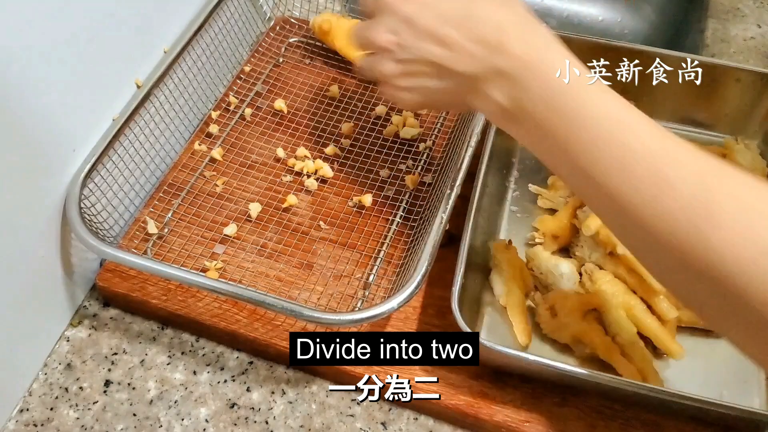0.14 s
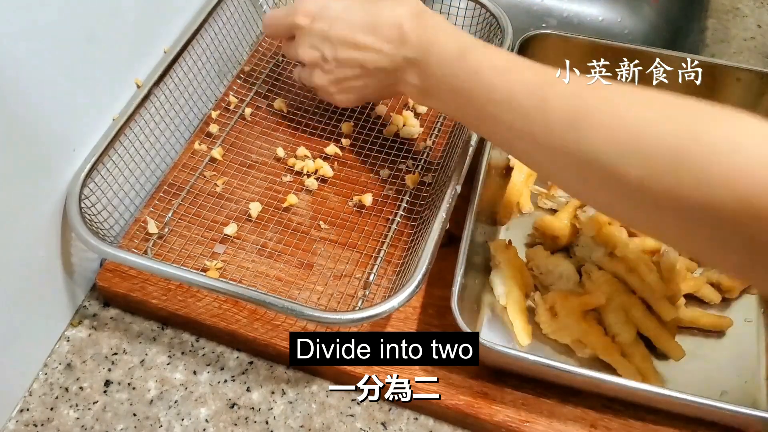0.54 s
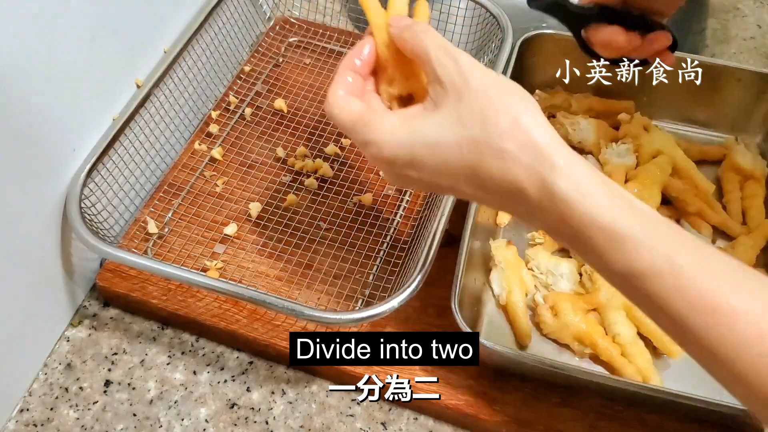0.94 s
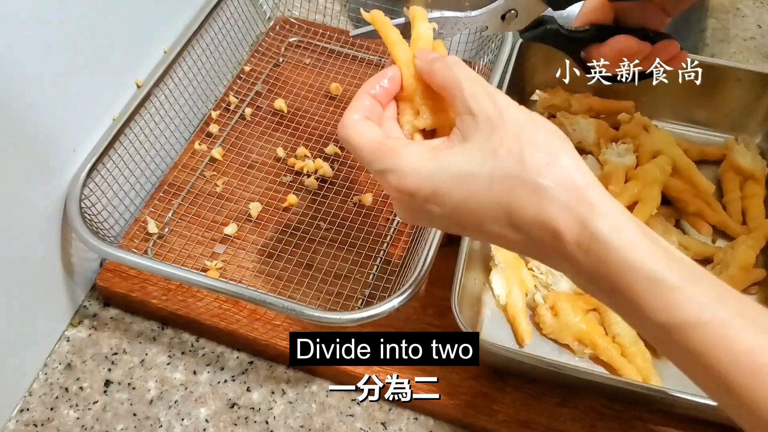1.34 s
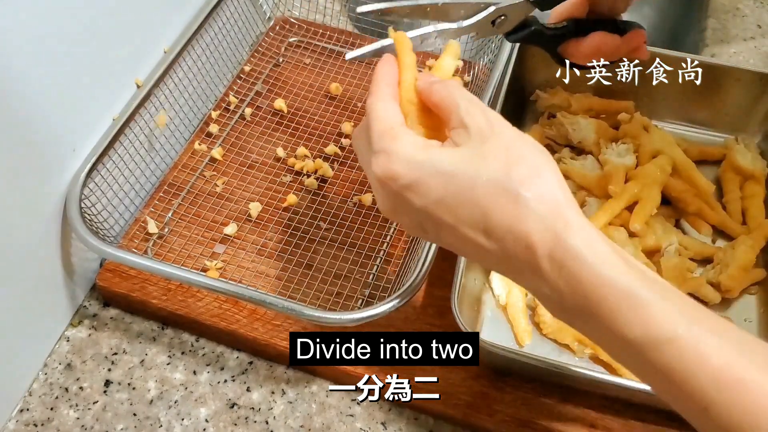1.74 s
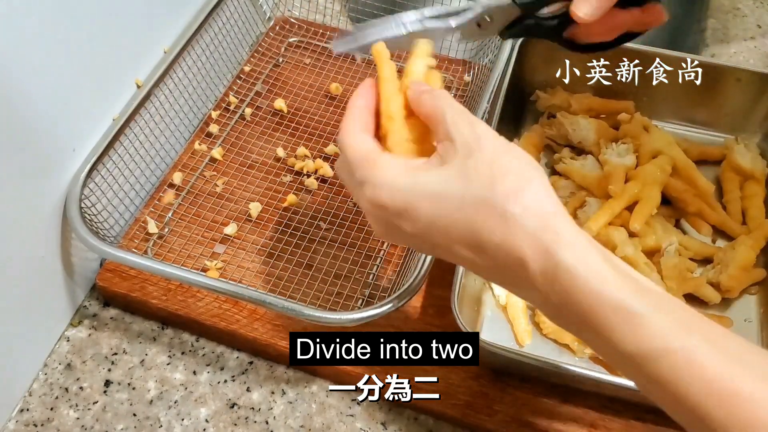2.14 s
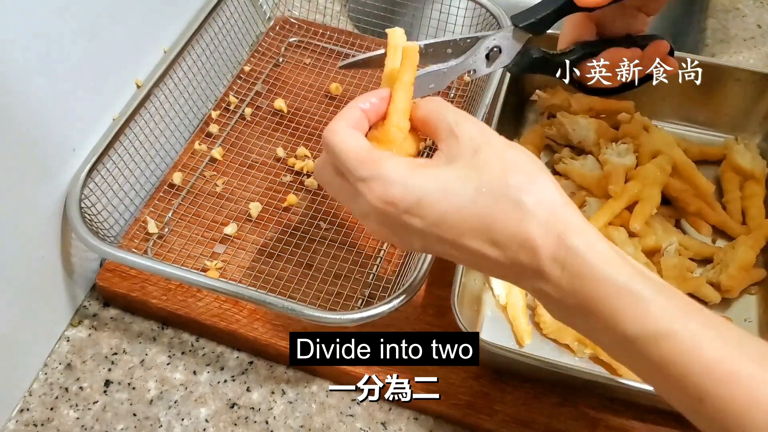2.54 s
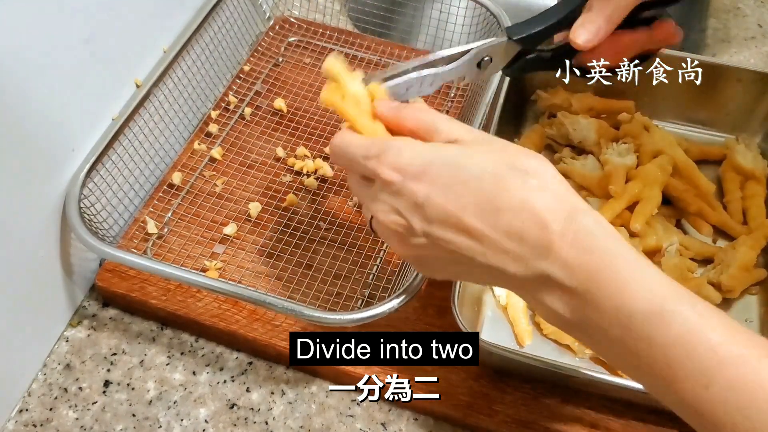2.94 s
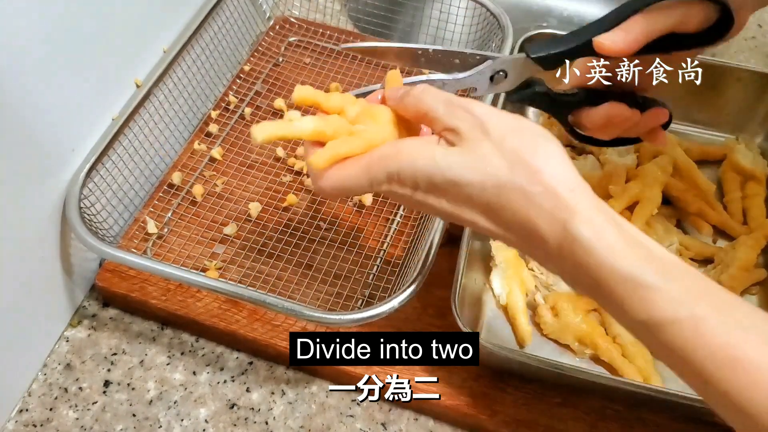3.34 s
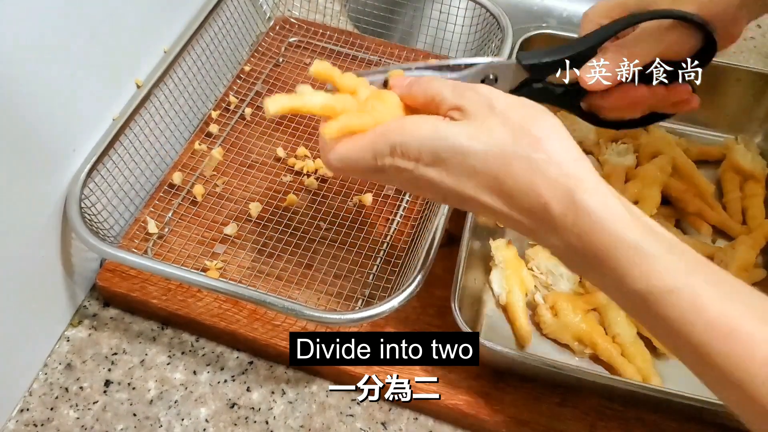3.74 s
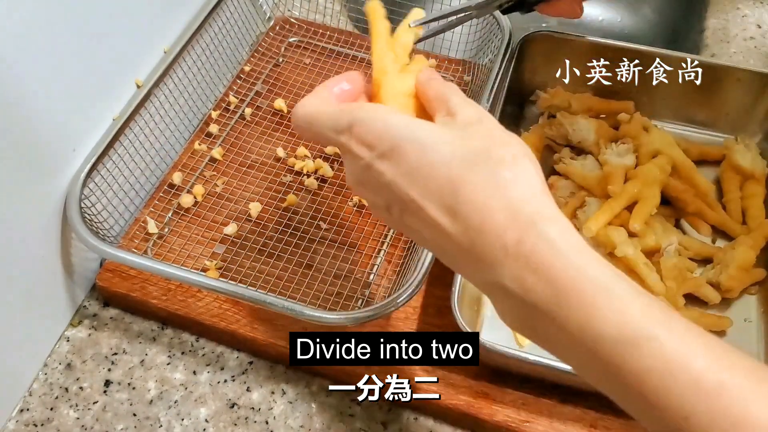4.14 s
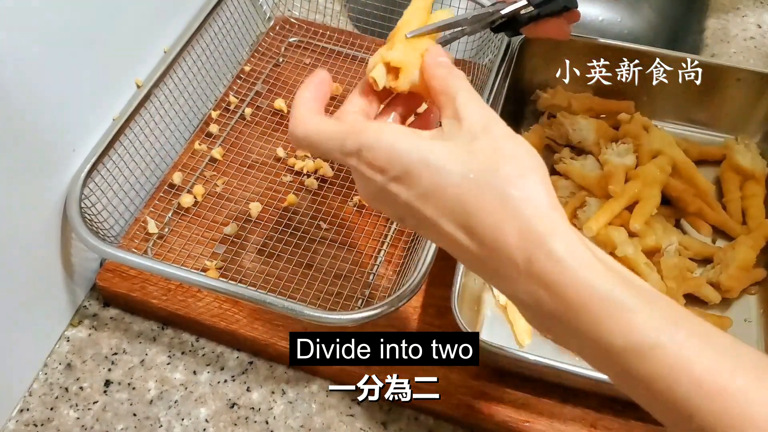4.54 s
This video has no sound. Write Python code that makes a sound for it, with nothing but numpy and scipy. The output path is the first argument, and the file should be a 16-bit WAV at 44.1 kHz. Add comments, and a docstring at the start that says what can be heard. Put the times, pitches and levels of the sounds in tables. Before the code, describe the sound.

A small, hard-surfaced kitchen with a low, slightly wavering fan hum and faint airy noise throughout. At about 0.27 s a cooked chicken foot lands in a thin steel tray: a loud, bright clank with a low thump and a brief ring, by far the strongest event. A wire basket rattles at 0.38 s and chatters in smaller ticks until 0.6 s. Soft grainy rubbing of fingers on skin follows from 1 to 1.6 s, with a gentle, dull ringing touch near 1.43 s. Then scissors snip crisply at 2.45, 3.07, 3.93 and 4.65 s, the last thinner and brighter. A very faint blade squeak precedes the second. Small bits skitter and blades scrape around 3.15 to 3.3 s; a sharp metallic click at 4.0 s is followed by ticks to 4.2 s. Close stereo microphone, work slightly left, short room reflections.

```python
"""Kitchen scissors clip the claw tips off cooked chicken feet; each snip is a short burst of bright noise.
A foot lands in a steel tray and a wire basket rattles as the next is picked up: bursts of contacts ring
their modes. Clipped bits skitter over the mesh, skin rubs as grainy noise and the blades squeak faintly.
The place is a small, hard-walled kitchen, heard in stereo with the work a little to the left; a fan hums
behind it as filtered noise."""
import sys
import numpy as np
from scipy import signal
from scipy.fft import rfft, irfft, next_fast_len
from scipy.io import wavfile
from scipy.ndimage import uniform_filter1d

SR = 44100
rng = np.random.default_rng(int(sys.argv[2]) if len(sys.argv) > 2 else 0)


def dump(signal):
    """Clip the signal to [-1, 1] and save it as 16-bit WAV at the path in sys.argv[1]."""
    limited = np.clip(np.atleast_2d(signal).T, -1, 1)
    pcm = np.round(limited * 32767).astype(np.int16)
    wavfile.write(sys.argv[1], SR, pcm)


N = 207291
T = np.arange(N) / SR


def undb(db):
    """Decibels to gain."""
    return 10 ** (np.asarray(db) / 20)


def unit(x):
    """Scale to rms 1."""
    return x / np.sqrt(np.mean(x ** 2))


def unit_energy(x):
    """Scale to energy 1."""
    return x / np.sqrt(np.sum(x ** 2))


def add(track, s, db, sound):
    """Mix a hit in at time s; its level is its energy spread over 10 ms."""
    start = int(s * SR)
    span = 0.01 * SR
    hit = undb(db) * np.sqrt(span) * unit_energy(sound)
    track[start:start + len(sound)] += hit[:N - start]


def colour(x, points, extra_db=lambda hz: 0):
    """Causal minimum-phase filter through (f/Hz, level/dB) points, plus an optional dB curve of frequency."""
    size = next_fast_len(len(x) // 2 + 2048) * 2
    hz = np.maximum(np.fft.rfftfreq(size, 1 / SR), 1)
    at, db = np.transpose(points)
    curve_db = np.interp(np.log(hz), np.log(at), db) + extra_db(hz)
    # folding the cepstrum onto positive times makes the filter causal
    cepstrum = irfft(np.log(undb(curve_db)))
    cepstrum[1:size // 2] *= 2
    cepstrum[size // 2 + 1:] = 0
    response = np.exp(rfft(cepstrum))
    return irfft(rfft(x, size) * response)[:len(x)]


def fade(t, t60):
    """Exponential decay, 60 dB down at t60."""
    return np.exp(-np.log(1000) * t / t60)


def wander(rate):
    """Random values, `rate` a second, joined by straight lines."""
    return np.interp(T * rate, np.arange(SR), rng.standard_normal(SR))


def narrow_noise(hz, width):
    """A resonance kept ringing by noise, rms 1; `width` is that of each of its two filter passes."""
    b, a = signal.iirpeak(hz, hz / width, fs=SR)
    once = signal.lfilter(b, a, rng.standard_normal(N + SR))
    twice = signal.lfilter(b, a, once)
    return unit(twice[SR:])  # the first second lets the resonance build up


def contacts(time, grit):
    """A burst of tiny uneven contacts that peaks at `time` and dies within a few times that."""
    t = T[:SR // 2]
    grains = rng.standard_normal(len(t)) * np.exp(grit * rng.standard_normal(len(t)))
    return unit_energy(grains * t * np.exp(-t / time))


def ring(push, modes, scatter_db, detune=0, count=1):
    """Modes set ringing by a push; each is `count` detuned neighbours, weighted anew at every spot struck."""
    t, out = T[:len(push)], 0
    for hz, db, t60 in modes:
        neighbours = hz * (1 + detune * rng.standard_normal((count, 1)))
        tone = np.sin(2 * np.pi * neighbours * t).sum(axis=0) * fade(t, t60)
        mode = signal.fftconvolve(push, tone)[:len(t)]
        out = out + undb(db + scatter_db * rng.standard_normal()) * unit_energy(mode)
    return unit_energy(out)


def place(x, pan_db):
    """Mono to stereo, left louder by pan_db."""
    return undb(np.array([[pan_db], [-pan_db]]) / 2) * x


# low rumble of the fan, spectrum shape: [f/Hz, relative level/dB per Hz]
RUMBLE = [(20, -30.5), (42, -14.5), (53, -8), (68, -0.5), (79.5, 8.5), (90, 0), (108, -4.5), (120, -5.5),
          (150, -16.5), (220, -40), (600, -77)]
# rough level of the low rumble over time, before HUM_DB is added: [t/s, level/dB]
HUM_LEVEL = [(0.0, -38.5), (0.46, -46), (0.51, -37), (0.77, -45.5), (0.95, -35.5), (1.6, -42), (2.11, -41),
             (4.7, -42)]
# air noise of the fan, spectrum shape: [f/Hz, relative level/dB per Hz]
AIR = [(60, -28.5), (160, -10), (210, -7.5), (275, -20), (400, -17), (520, -21), (860, -34), (1300, -32),
       (2200, -43), (3000, -42), (4250, -53.5), (8000, -55), (16000, -48)]
# resonances of the fan and its duct: [f/Hz, width of each filter pass/Hz, level/dB]
DUCT = [(196, 5, -55.5), (398.5, 5.9, -64)]
HUM_DB = 1  # gain of the rumble
WAVER_DB, WAVER_PER_S = 1.5, 8.8  # random waver of the hum: typical depth and points per second


def fan_noise(air_db=-50.5, even_s=0.12):
    """A wavering rumble, turbulent air, and the narrow resonances that it keeps humming."""
    rumble = colour(rng.standard_normal(N), RUMBLE)
    # even out the rumble's own fluctuations so that the level curve sets its strength
    rumble /= np.sqrt(uniform_filter1d(rumble ** 2, int(even_s * SR)))
    hum_db = np.interp(T, *np.transpose(HUM_LEVEL)) + HUM_DB + WAVER_DB * wander(WAVER_PER_S)
    air = undb(air_db) * unit(colour(rng.standard_normal(N), AIR))
    duct = sum(undb(db) * narrow_noise(hz, width) for hz, width, db in DUCT)
    return rumble * undb(hum_db) + air + duct


# stereo width of the fan, side minus mid: [f/Hz, level/dB]
FAN_WIDTH = [(30, -36.5), (80, -30.5), (160, -15.5), (300, -8), (600, -4), (1200, 0), (4000, -1.5),
             (8000, -57)]


def fan():
    """Behind the work: the low hum reaches both microphones nearly alike; the air noise is more diffuse."""
    side = colour(fan_noise(), FAN_WIDTH)
    return place(fan_noise() + np.array([side, -side]), pan_db=1.13)


# stereo width of the reflections, side minus mid: [f/Hz, level/dB]
ROOM_WIDTH = [(200, -3), (500, -8), (1100, -2.5), (5000, 2.5), (8000, -7.5), (14000, -10.5)]


def echo_difference(t):
    """What the two microphones hear differently of dense echoes: noise of opposite sign in each."""
    side = colour(rng.standard_normal(len(t)), ROOM_WIDTH)
    return np.array([side, -side])


def kitchen(x, near_db, room_db, pan_db, low_t60=0.22, high_t60=0.16, split_hz=7000, build_s=0.0036):
    """Quick reflections off the counter and trays, then a short tail whose treble dies first."""
    t = T[:SR // 2]

    def echoes(kind):
        """Dense echoes on one side of the split frequency."""
        band = signal.butter(2, split_hz, kind, fs=SR, output="sos")
        return signal.sosfilt(band, rng.standard_normal(len(t)) + echo_difference(t))

    tail = echoes("low") * fade(t, low_t60) + echoes("high") * fade(t, high_t60)
    tail = tail * (1 - np.exp(-(t / build_s) ** 2))
    # reflections start 0.8 ms after the direct sound, which is the first sample
    early = undb(near_db) * unit_energy(echo_difference(t) * fade(t, 0.025) * (t > 0.0008))
    early[:, 0] += np.sqrt(0.5)
    # the work lies a little to the left; the tail comes from all around
    response = place(unit_energy(early), pan_db) + undb(room_db) * unit_energy(tail)
    return np.sqrt(2) * signal.fftconvolve(x[None], response, axes=1)[:, :N]


# blows on the steel tray: [t/s, level/dB, rattle time/s]
BLOWS = [(0.2665, -27, 0.00068), (.2692, -15.5, 0.0014), (0.273, -18, 0.0018), (.287, -31.5, 0.022)]
# modes of the tray: [f/Hz, relative level/dB, t60/s]
TRAY_MODES = [(1650, -6.5, .1), (2400, 2, 0.18), (2560, -11, .14), (2836, -0.5, 0.15), (3270, -2, 0.11),
              (4400, -0.5, 0.15), (7420, -3, 0.083), (9400, -5.5, 0.2), (12000, 0.5, 0.057),
              (13490, -3, .1), (14400, 4, .08), (14500, -0.5, 0.14)]
# colour of the tray's clatter: [f/Hz, level/dB]
TRAY_COLOUR = [(200, -15), (500, -5.5), (850, -20), (1300, -8.5), (1700, -5), (2400, 3.5), (3500, -4),
               (4500, 1), (7000, -4), (10200, -8.5), (11600, 2), (15500, 1.5)]
# low thumps on the trays, the foot's landing, then a soft touch that rings:
# [t/s, thump level/dB, ring level/dB, push time/s]
THUDS = [(0.2719, -25.5, -42, 0.0042), (1.439, -55, -37.5, 0.0026)]
# modes of the trays' flat bottoms: [f/Hz, relative level/dB, t60/s]
THUD_MODES = [(464, 5.5, 0.47), (535, -4.5, 0.14), (663, -4.5, 0.16)]
# colour of a thump: [f/Hz, level/dB]
THUMP_COLOUR = [(100, -53.5), (270, -27), (390, -4.5), (490, -3), (610, -3.5), (740, -22), (2000, -45.5)]


def tray():
    """On the counter: thin steel clatters under blows; low thumps leave the flat bottom ringing."""
    out = np.zeros(N)
    for s, db, time in BLOWS:
        blow = contacts(time, grit=0)
        clatter = unit_energy(colour(blow, TRAY_COLOUR))
        steel = undb(-10) * ring(blow, TRAY_MODES, scatter_db=1.5, detune=0.008, count=6)
        add(out, s, db, clatter + steel)
    thump = colour(signal.unit_impulse(SR // 10), THUMP_COLOUR)
    for s, thump_db, ring_db, time in THUDS:
        add(out, s, thump_db, thump)
        add(out, s, ring_db, ring(contacts(time, grit=0), THUD_MODES, scatter_db=2.0))
    return out


# taps on the wire basket, and a few scrapes of the opening blades:
# [t/s, level/dB, rattle time/s, favoured f/Hz, body gain/dB, treble gain/dB]
TAPS = [(0.2305, -51.5, 0.0018, 2158, 9, -22), (.376, -25.5, 0.0086, 5500, 2.5, -4),
        (0.4503, -37.5, .0036, 6600, -1, -3.5), (.471, -38.5, 0.0046, 5700, -10, -5),
        (0.501, -45.5, 0.0054, 6430, -3, -3), (0.547, -41.5, 0.0085, 6100, -31, 2.5),
        (.603, -37, 0.0067, 6350, -29, -3), (1.04, -60.5, 0.00075, 5940, -10, 3),
        (1.352, -49.5, 0.011, 6370, 6, -6), (1.42, -43, 0.0074, 4700, 24.5, 7),
        (1.516, -55.5, 0.0021, 6340, 7.5, -8), (2.607, -52, 0.0031, 3200, 8, -7),
        (2.686, -50.5, 0.023, 4560, 15, -19), (3.1426, -44, 0.0052, 6000, 10.5, -13),
        (3.231, -38.5, 0.0073, 4850, 15, -0.5), (3.282, -47, 0.006, 6330, 16.5, -8),
        (3.452, -61, .011, 5830, -1, -5), (3.967, -33.5, 0.00086, 5400, 8, 3),
        (4.0073, -27.5, 0.0039, 5540, 2.5, 4.5), (4.117, -48, 0.00084, 4230, 7, 0),
        (4.14, -34.5, 0.0013, 4170, 4, -9), (4.206, -39.5, 0.0031, 6940, -1, 7)]
# modes of the basket's wires: [f/Hz, relative level/dB, t60/s]
WIRE_MODES = [(2450, -5.5, 0.14), (3500, 4, 0.088), (3653, 2, 0.037), (4650, -7, .09), (5350, -13, .07),
              (5766, -14, .08), (6260, -10.5, .09), (6600, -2, 0.086), (6760, 7.5, 0.038), (7860, -3, .06)]
# colour of a tap before its favoured region, body and treble are added: [f/Hz, level/dB]
TAP_COLOUR = [(200, -7.5), (500, -8), (900, -19), (2000, -11), (4000, -9), (6800, -7.5), (8000, -9),
              (11000, -5.5), (15500, -18)]
# a longer rattle reaches more wires, so its favoured region of pitch is wider:
# spread in octaves at this rattle time in s, and the exponent
TAP_OCTAVES, TAP_RATTLE_S, TAP_WIDENING = 0.44, 0.005, 0.24


def basket_and_scrapes(bump_db=12, buzz_db=-5, buzz_t60=0.047, body_hz=2000, treble_hz=8000, wires_db=-12):
    """On the counter: crossed wires chatter, buzz on and ring; blade scrapes are made the same way."""
    out, t = np.zeros(N), T[:SR // 2]
    for s, db, time, centre_hz, body_db, treble_db in TAPS:
        octaves = TAP_OCTAVES * (time / TAP_RATTLE_S) ** TAP_WIDENING
        chatter = contacts(time, grit=0.56)
        buzz_decay = rng.standard_normal(len(t)) * fade(t, buzz_t60)
        buzz = undb(buzz_db) * unit_energy(signal.fftconvolve(chatter, buzz_decay)[:len(t)])
        wires = undb(wires_db) * ring(chatter, WIRE_MODES, scatter_db=-1, detune=0.026, count=4)

        def spot(hz):
            """Each tap has its own favoured pitch, amount of body, as of squeezed flesh, and of treble."""
            favoured = bump_db * np.exp(-(np.log2(hz / centre_hz) / octaves) ** 2 / 2)
            body = body_db / (1 + (hz / body_hz) ** 4)
            treble = treble_db * np.clip(hz / treble_hz, 0, 2) ** 2 / 2
            return favoured + body + treble

        add(out, s, db, colour(chatter + buzz + wires, TAP_COLOUR, spot))
    return out


# strokes of blades and fingers over the skin, before catching: [start t/s, hold/s, level/dB]
STROKES = [(0.249, 0.4, -58.5), (1.03, 0.06, -64), (1.158, 0.3, -57), (1.72, 0.18, -69), (2.45, .14, -61),
           (3.08, 0.21, -59.5), (3.93, .29, -55.5), (4.66, 0.037, -61.5)]
# colour of the rubbing: [f/Hz, relative level/dB]
RUB_COLOUR = [(300, -4), (1500, -1), (3000, -7.5), (6000, -6), (8500, -10), (13000, -6.5), (16000, -5)]
STROKE_ATTACK_S, STROKE_T60_S = 0.012, 0.28  # swell up to the start, decay after the hold
HOLDING_DB = -75  # the foot never lies quite still in the fingers


def rubbing(grit=0.7, catch_db=3.0, catch_rate=60):
    """Fine friction grains whose strength catches and slips; each stroke swells, holds and dies away."""
    grains = rng.standard_normal(N) * np.exp(grit * rng.standard_normal(N))
    pressure = undb(HOLDING_DB)
    for s, hold, db in STROKES:
        swell = np.exp(np.minimum(T - s, 0) / STROKE_ATTACK_S)
        release = fade(np.maximum(T - s - hold, 0), STROKE_T60_S)
        pressure = pressure + undb(db) * swell * release
    catching = undb(catch_db * wander(catch_rate))
    return unit(colour(grains, RUB_COLOUR)) * pressure * catching


SQUEAK_S, SQUEAK_LENGTH_S, SQUEAK_DB = 2.995, 0.19, -66.5  # middle, length, rms level at the middle


def squeak(hz=3000, width=650):
    """Blade slides on blade under load as it presses, a faint narrow noise swelling and fading once."""
    swell = np.cos(np.pi * np.clip((T - SQUEAK_S) / SQUEAK_LENGTH_S, -0.5, 0.5)) ** 2
    return undb(SQUEAK_DB) * swell * narrow_noise(hz, width)


# the blades crack through a claw: [t/s, level/dB, crack time/s, tilt above 1 kHz/dB per octave]
SNIPS = [(2.44, -46.5, 0.0012, 3), (2.449, -31, 0.0017, 2.5), (3.066, -30.5, 0.0013, 0.2),
         (3.9316, -32, 0.0023, 1), (4.6497, -34.5, 0.002, 10)]
# colour of a snip before its tilt: [f/Hz, level/dB]
SNIP_COLOUR = [(300, -0.5), (1000, -23), (1850, -2), (2400, -7), (3100, -9), (4000, -16), (6500, -9),
               (9000, -10.5), (11000, -3), (12200, -11), (14000, -2.5), (16000, -5)]


def snips():
    """In the hand: the claw gives way between the blades with a short, bright crack."""
    out = np.zeros(N)
    for s, db, time, tilt in SNIPS:

        def brighten(hz):
            """Treble rising by `tilt` an octave."""
            return tilt * np.log2(np.maximum(hz, 1000))

        add(out, s, db, colour(contacts(time, grit=0.3), SNIP_COLOUR, brighten))
    return out


def scene():
    """Fan behind, basket and tray on the counter, scissors and foot in the hands."""
    counter = kitchen(basket_and_scrapes() + tray(), near_db=-4.5, room_db=-6.5, pan_db=3.5)
    held = kitchen(snips() + rubbing() + squeak(), near_db=-3.0, room_db=-4.5, pan_db=2.5)
    return fan() + counter + held


TOP_HZ = 15900  # upper edge of what the recorder passes


def record(dry):
    """The recorder rounds the loudest peaks and cuts the top."""
    ceiling = 0.65
    rounded = ceiling * np.tanh(dry / ceiling)
    return signal.sosfilt(signal.ellip(10, 0.2, 70, TOP_HZ, fs=SR, output="sos"), rounded)


dry = scene()
out = record(dry)
dump(out)
```